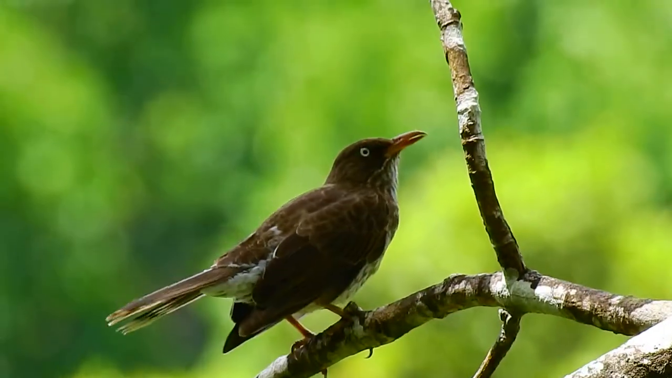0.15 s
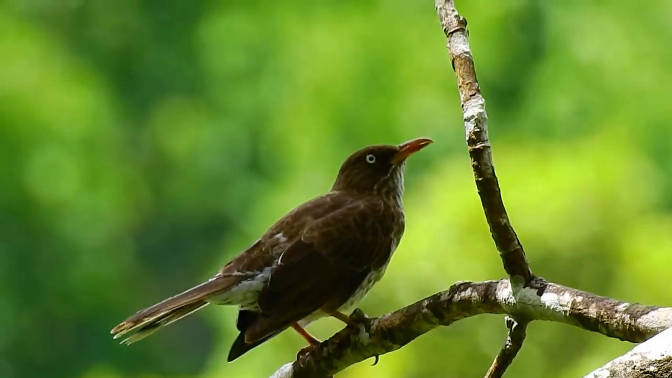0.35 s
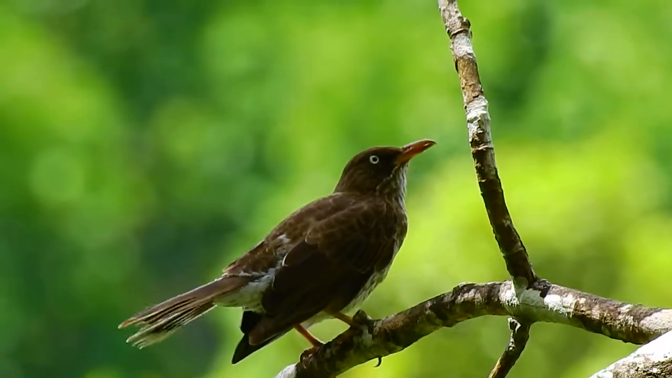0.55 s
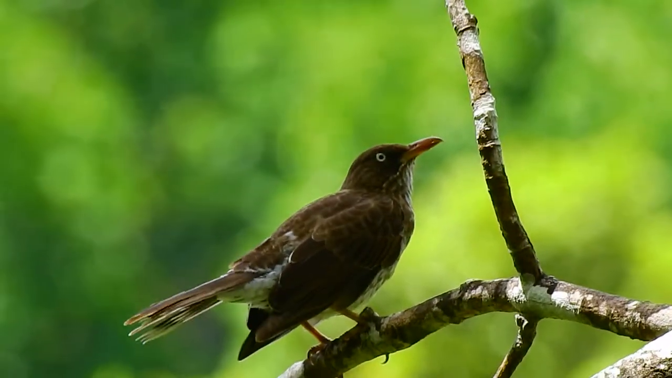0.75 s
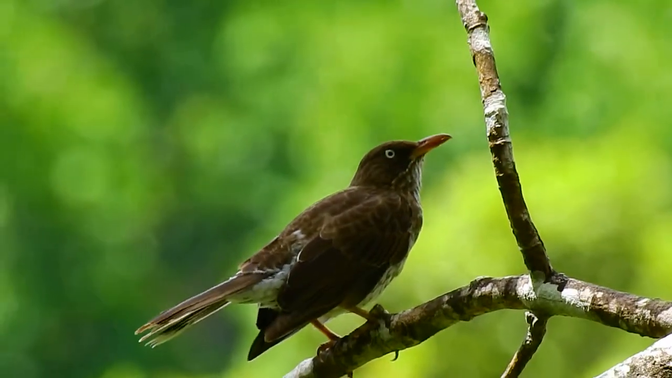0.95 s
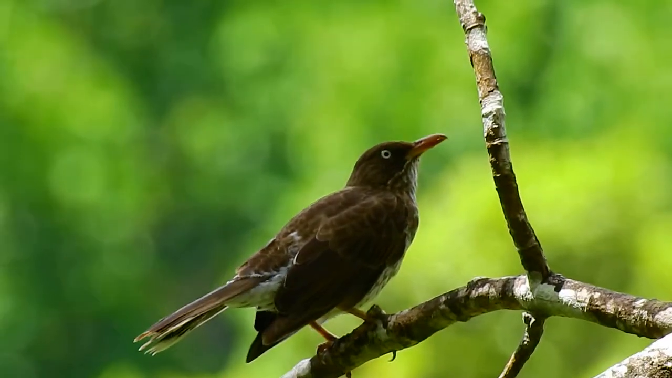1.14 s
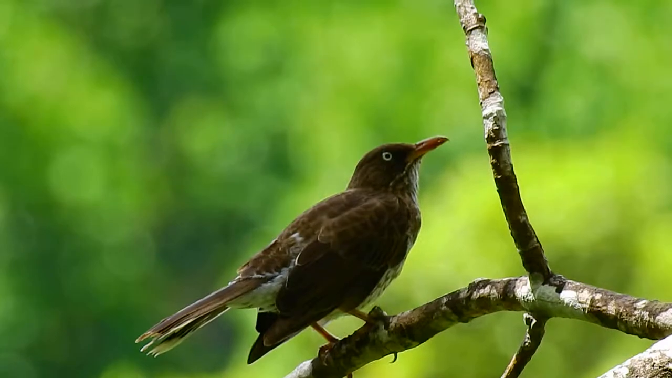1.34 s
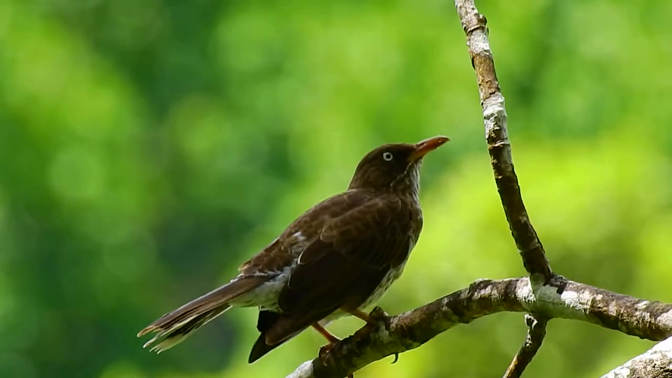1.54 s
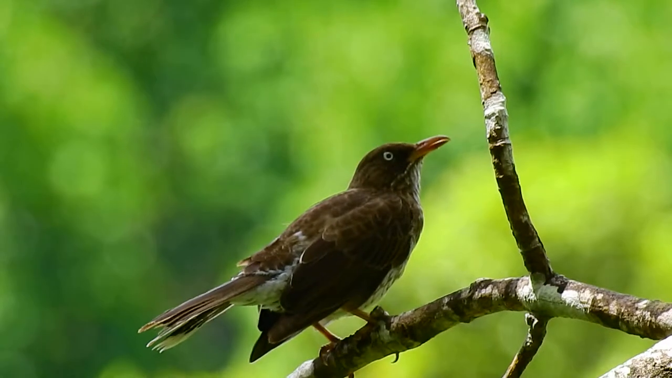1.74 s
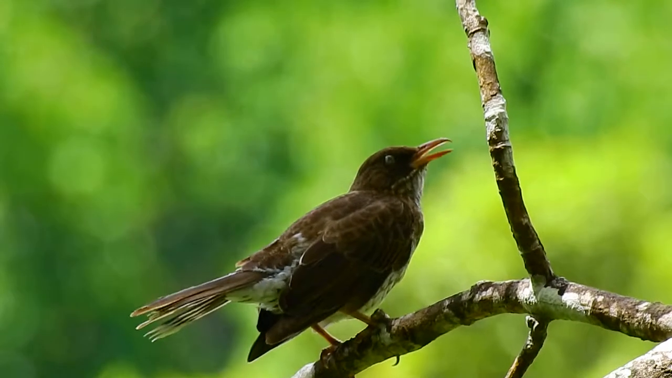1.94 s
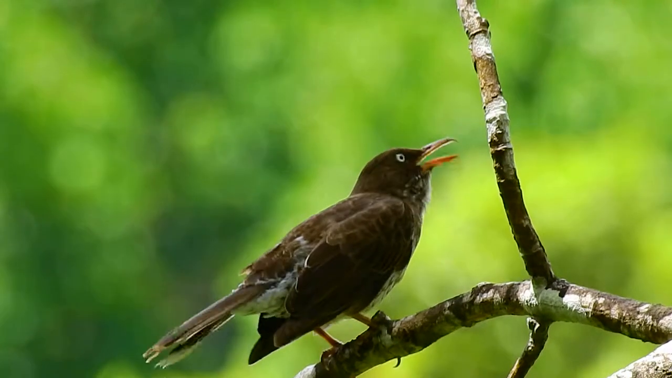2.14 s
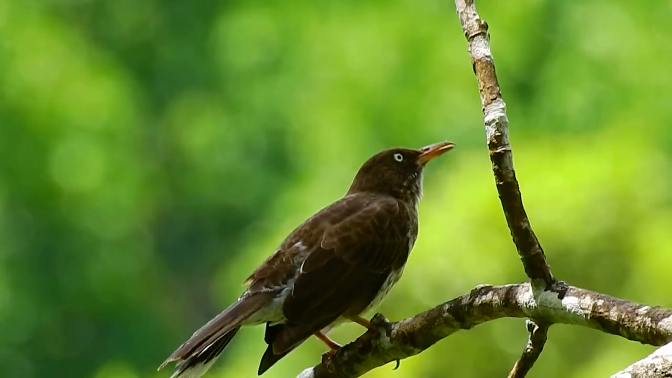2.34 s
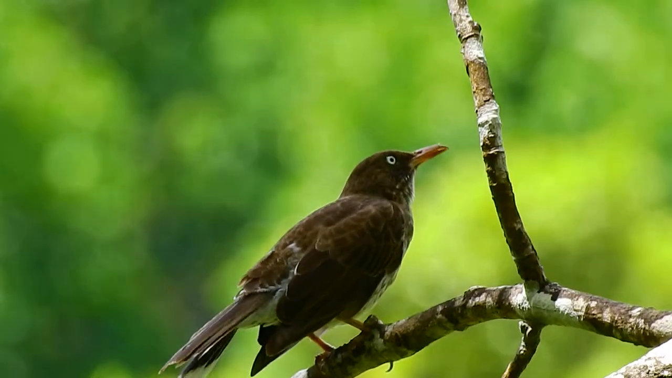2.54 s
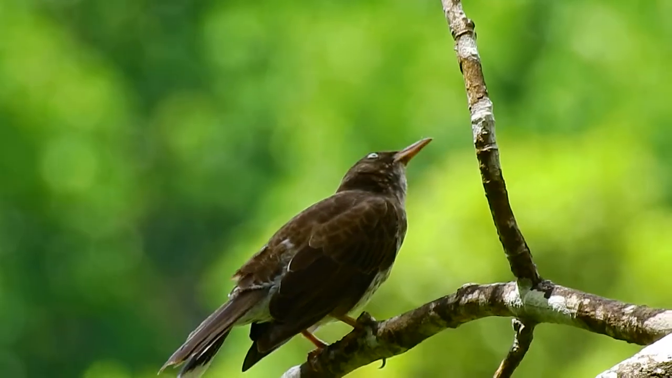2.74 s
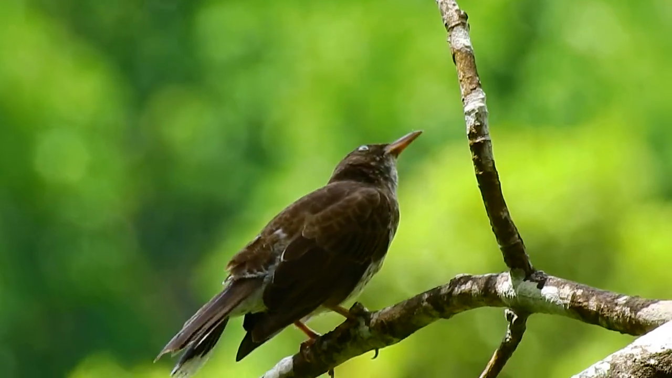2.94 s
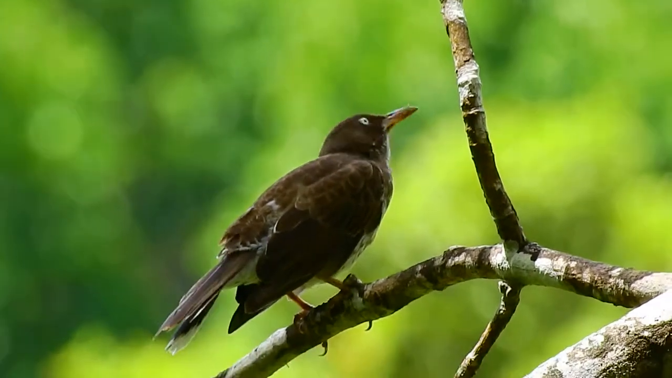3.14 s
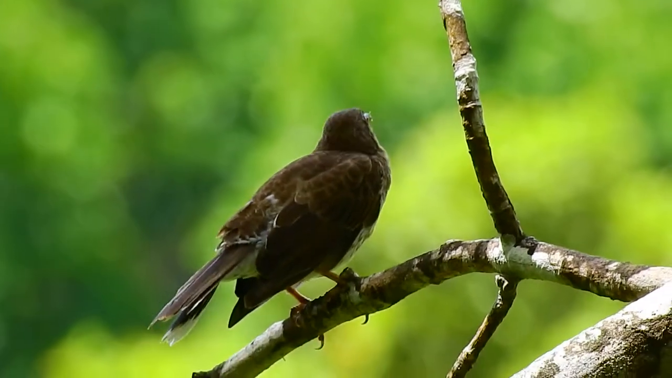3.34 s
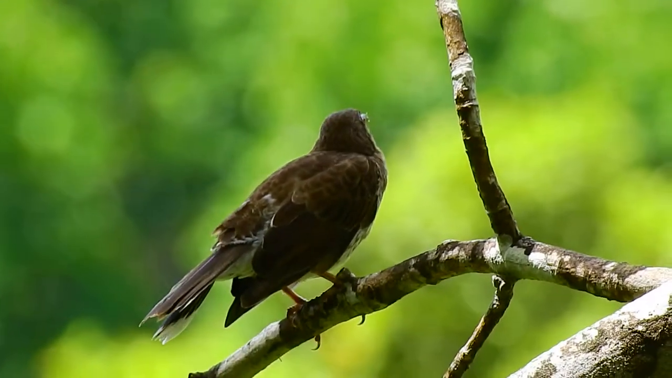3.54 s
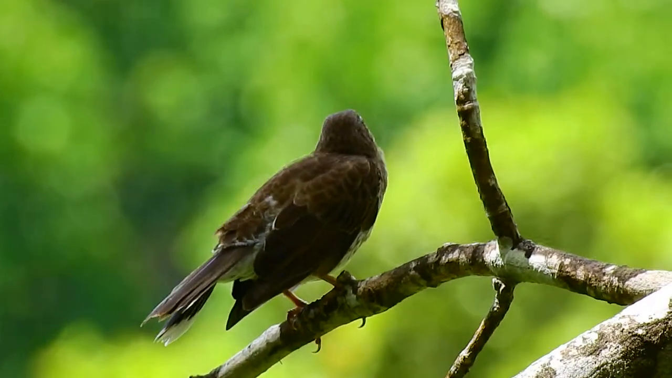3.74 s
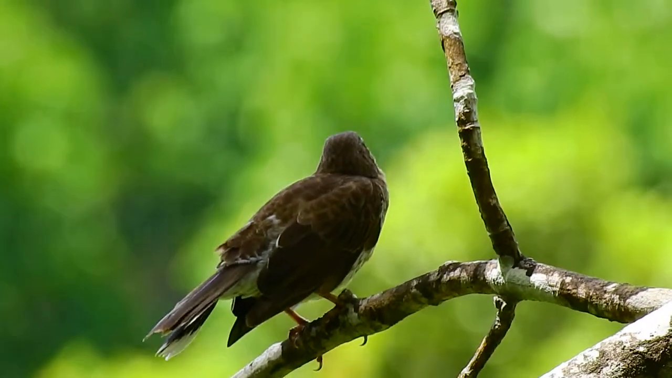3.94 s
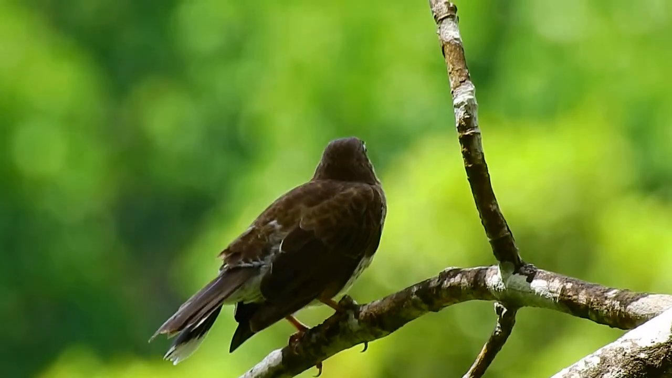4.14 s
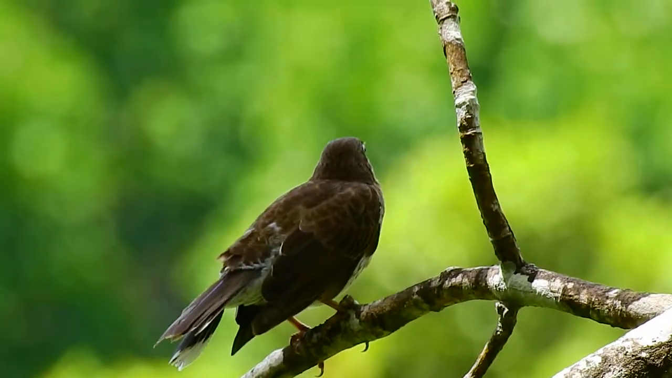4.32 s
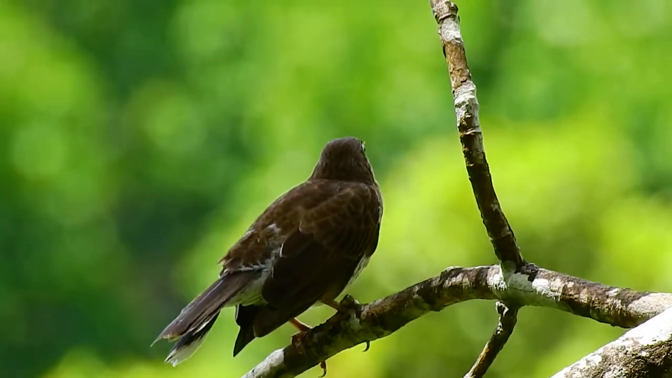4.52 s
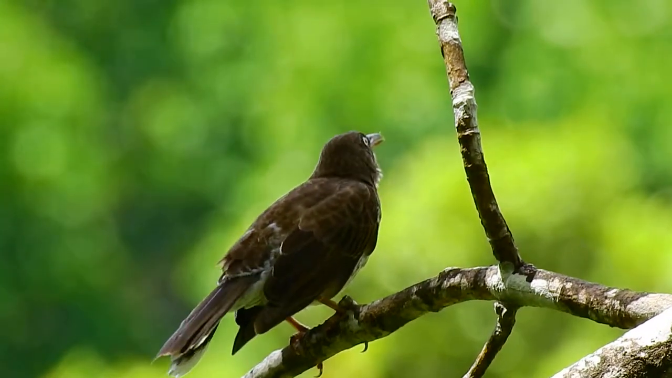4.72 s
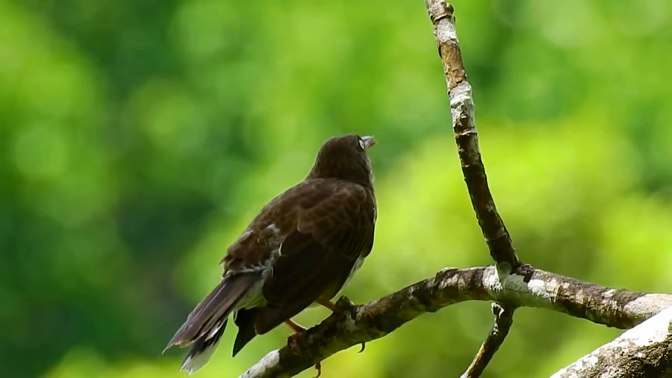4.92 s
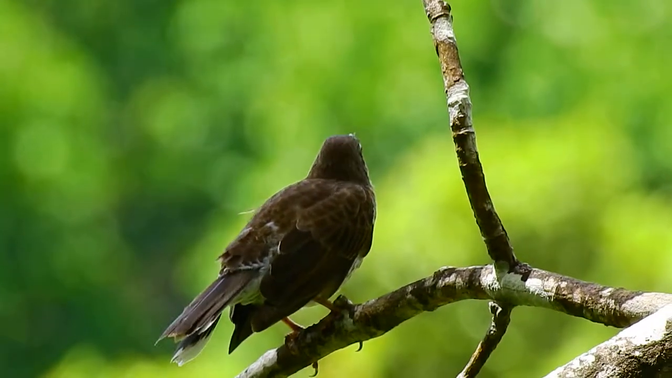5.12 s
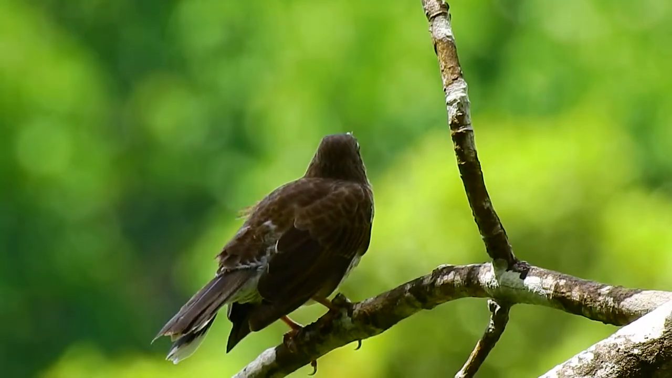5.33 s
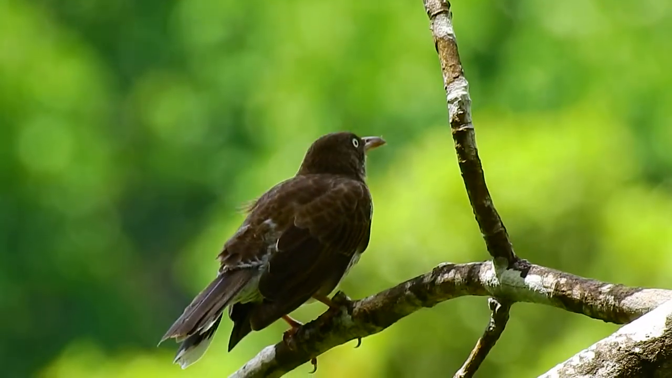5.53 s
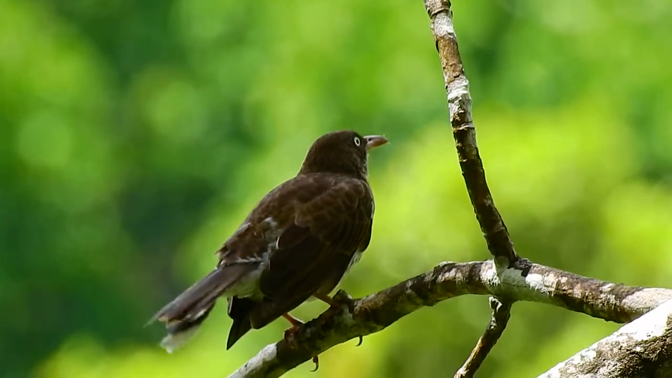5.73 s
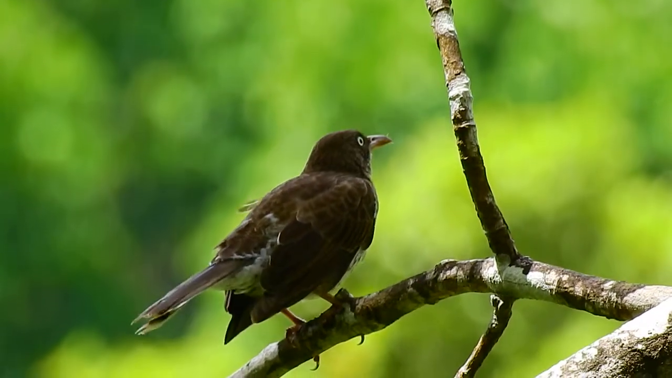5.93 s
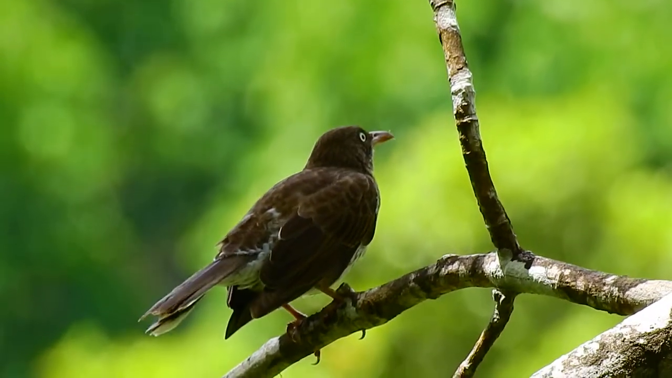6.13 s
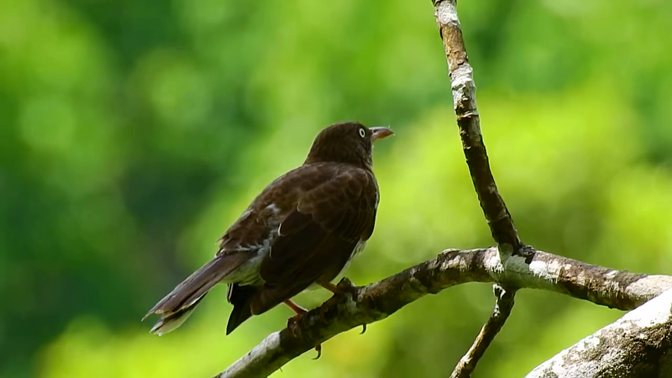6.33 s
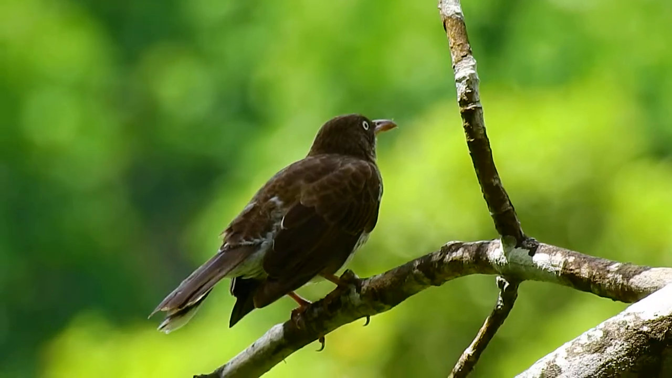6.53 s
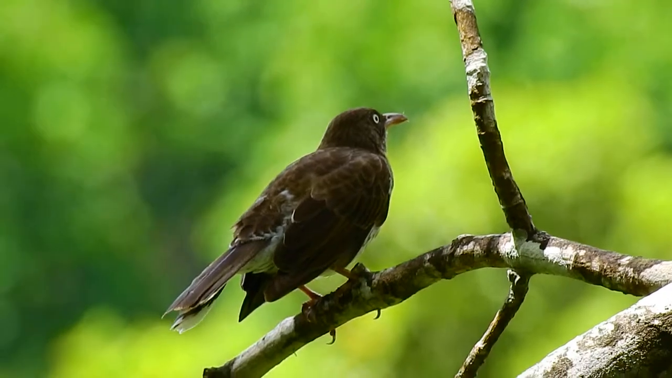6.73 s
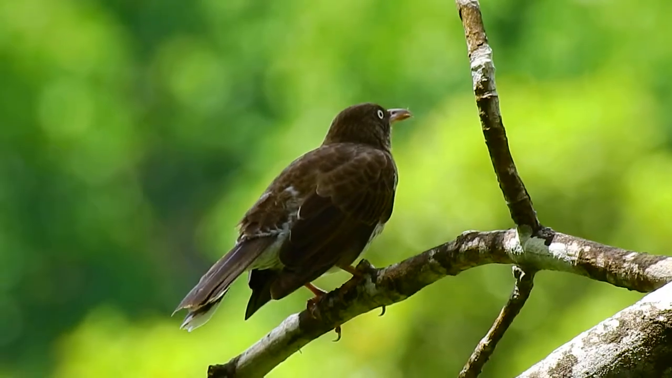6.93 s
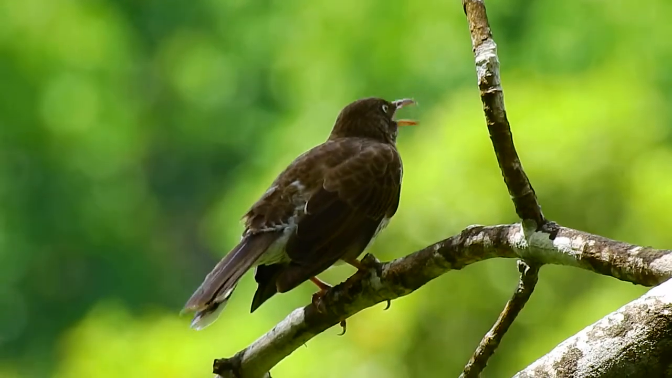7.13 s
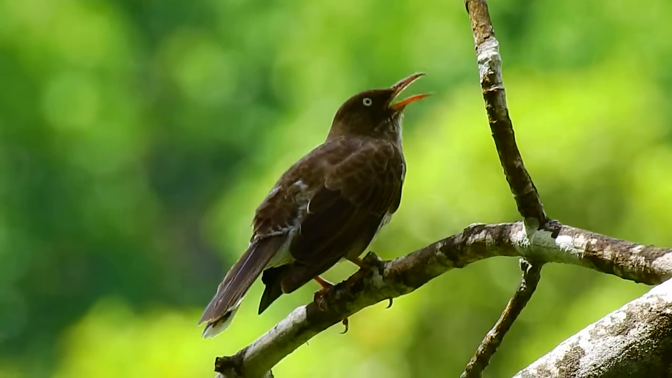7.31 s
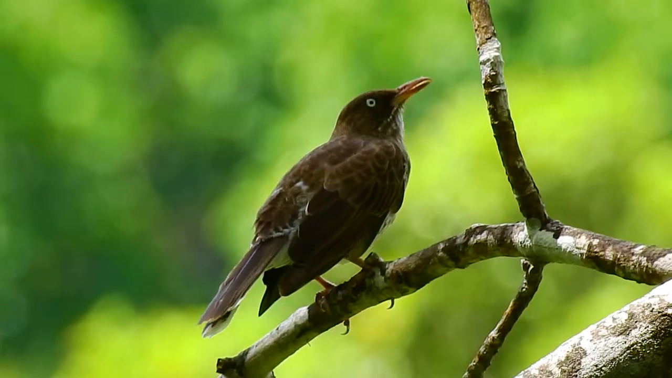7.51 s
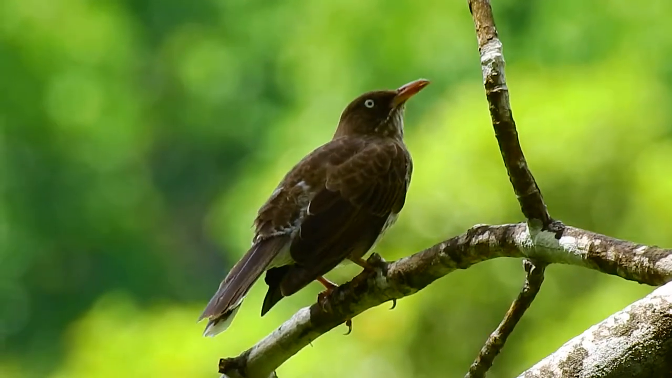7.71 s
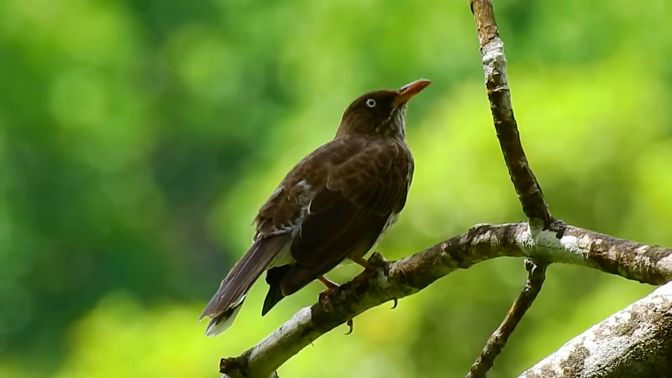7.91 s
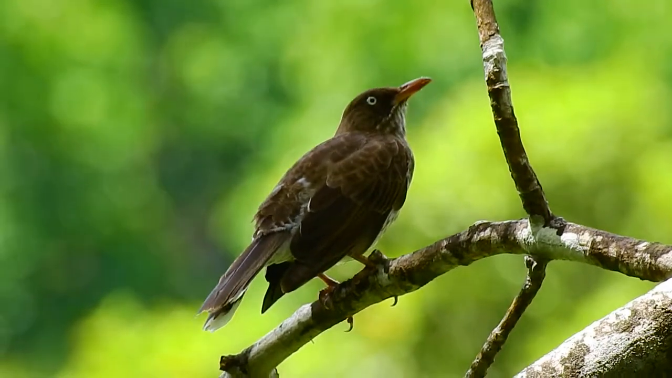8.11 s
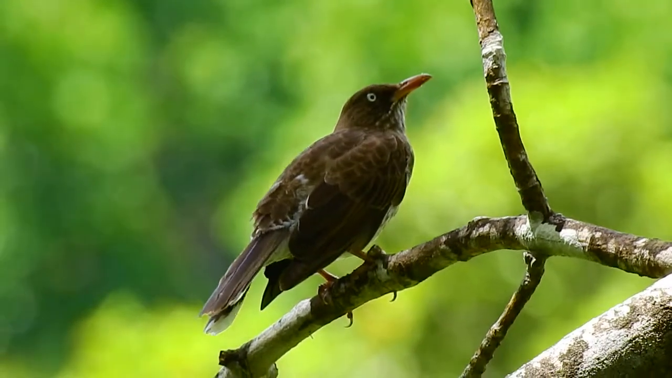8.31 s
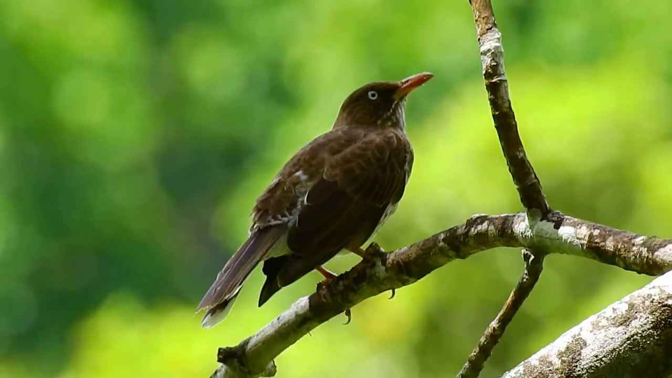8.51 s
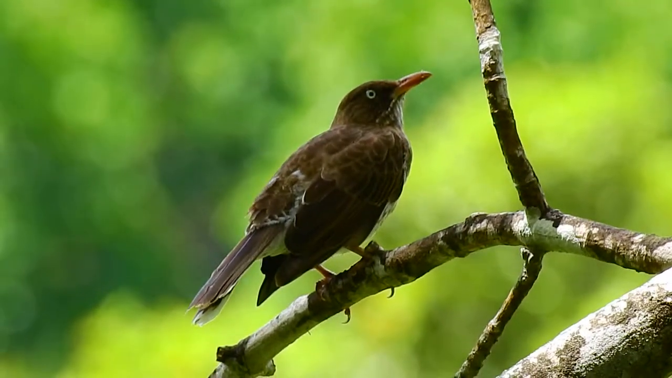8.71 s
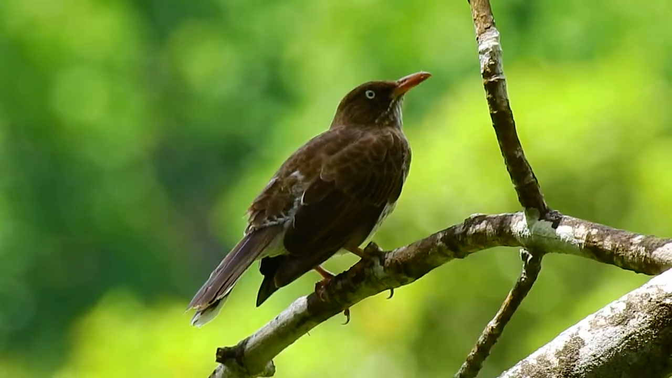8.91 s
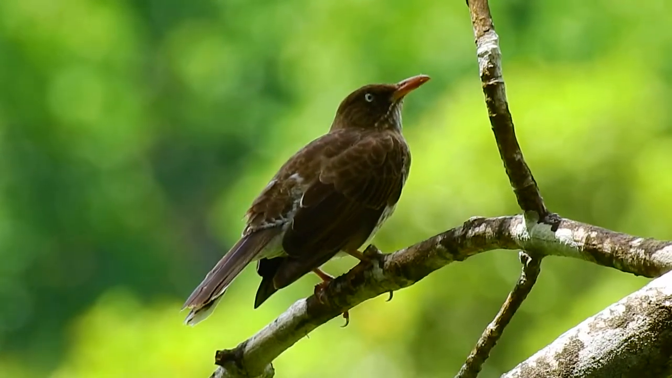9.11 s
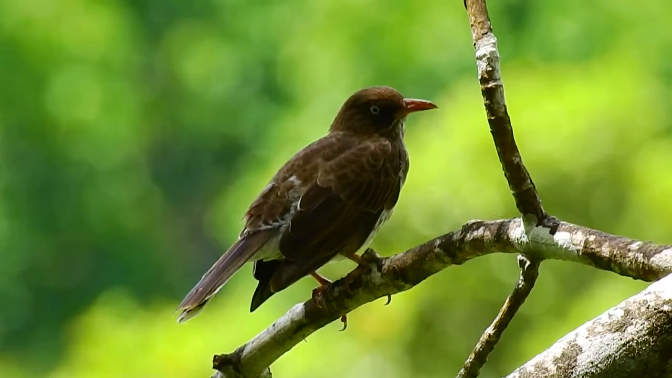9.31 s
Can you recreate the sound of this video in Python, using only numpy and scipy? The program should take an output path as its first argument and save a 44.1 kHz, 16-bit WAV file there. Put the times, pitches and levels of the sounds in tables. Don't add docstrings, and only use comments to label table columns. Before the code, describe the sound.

A nearby songbird whistles brief, bright falling phrases with woody echoes, over soft leaf hiss, distant blurred bird calls and a thin insect tone.

```python
import sys
import numpy as np
from scipy import signal
from scipy.fft import rfft, irfft, next_fast_len
from scipy.io import wavfile
from scipy.ndimage import uniform_filter1d, map_coordinates

SR = 44100
rng = np.random.default_rng(int(sys.argv[2]) if len(sys.argv) > 2 else 0)


def waveform_to_disk(signal):
    frames = np.transpose(np.atleast_2d(signal))
    scaled = np.clip(frames, -1, 1) * 32767
    samples = np.round(scaled).astype(np.int16)
    wavfile.write(sys.argv[1], SR, samples)


def invert_db(x):
    u = np.asarray(x, float) / 20
    return 10 ** u


N = 412776
LEAD_SAMPLES = SR // 4

# start_s [s], pitch_hz [Hz], level_db [dB]
SONG_NOTES = [
    [(0, 2236, -23), (0.025, 2255, -25), (0.034, 2290, -27), (0.048, 2290, -20), (0.056, 2320, -33)],
    [(2.158, 5050, -29), (2.17, 5180, -22), (2.183, 5310, -11.5), (2.192, 4830, -15), (2.204, 4426, -10),
     (2.214, 3940, -19.5), (2.222, 3740, -22), (2.23, 3540, -31)],
    [(2.24, 3264, -35), (2.248, 3090, -23), (2.256, 2776, -13.5), (2.266, 2465, -14), (2.28, 2340, -12),
     (2.293, 2210, -18.5), (2.299, 2050, -26), (2.307, 1930, -42)],
    [(2.337, 2850, -29), (2.346, 2760, -19.5), (2.354, 2450, -20), (2.362, 2050, -23), (2.372, 1620, -33),
     (2.388, 1300, -48), (2.4, 1200, -44), (2.412, 1140, -51)],
    [(7.286, 5250, -27), (7.295, 5265, -19.5), (7.312, 5190, -15.5), (7.32, 4964, -10), (7.33, 4640, -14),
     (7.35, 4430, -19.5), (7.363, 4260, -27)],
    [(7.364, 3040, -38), (7.371, 2693, -28), (7.379, 2357, -22.5), (7.39, 2143, -28.5), (7.41, 2106, -33),
     (7.435, 2086, -40)],
    [(7.401, 3080, -33), (7.412, 3303, -23), (7.428, 3330, -15), (7.44, 3450, -20.5), (7.453, 3527, -19),
     (7.461, 3580, -26)],
]
# start_s [s], pitch_hz [Hz], level_db [dB]
SOFT_NOTES = [
    [(4.743, 2155, -46), (4.755, 1800, -41), (4.768, 1582, -40), (4.788, 1534, -43), (4.8, 1540, -37),
     (4.83, 1545, -39), (4.843, 1530, -46)],
    [(4.846, 1480, -45), (4.858, 1330, -43), (4.868, 1200, -42.5), (4.874, 1130, -50)],
    [(4.74, 3390, -42), (4.75, 3200, -46), (4.768, 3200, -45), (4.785, 3180, -54), (4.8, 3180, -48),
     (4.812, 3180, -55), (4.83, 3180, -52)],
    [(7.243, 5900, -50), (7.25, 5200, -41), (7.258, 4940, -40), (7.266, 4370, -42), (7.276, 3960, -43),
     (7.295, 3550, -54), (7.312, 3250, -57)],
    [(7.453, 2850, -34), (7.459, 2650, -30), (7.465, 2350, -31.5), (7.472, 1900, -40), (7.485, 1450, -47),
     (7.496, 1220, -46.5), (7.503, 1130, -53)],
    [(4.744, 4850, -52), (4.754, 4450, -49), (4.766, 4050, -53)],
]
SOFT_ECHO_DB = [-6, -6, -12, -2, -5, -6]
# start_s [s], pitch_hz [Hz], level_db [dB]
TWANG_NOTE = [(4.738, 3380, -36), (4.748, 2605, -32.5), (4.76, 2404, -28), (4.777, 2170, -40)]
# start_s [s], length_s [s], from_hz [Hz], to_hz [Hz], level_db [dB]
NASAL_SLIDES = [
    (2.157, .053, 3940, 3942, -36.5),
    (7.278, .05, 3950, 4000, -43.5),
]
# start_s [s], length_s [s], from_hz [Hz], to_hz [Hz], level_db [dB]
EARLIER_SLIDES = [
    (-.12, .06, 8300, 6300, -19.5),
    (-.08, .04, 9300, 7600, -26),
    (-.09, .04, 4750, 4500, -26.5),
    (-.12, .04, 5300, 4900, -28.5),
    (-0.0703, .065, 2760, 2700, -19),
    (-.03, .032, 2300, 2270, -29),
    (-.1, 0.049, 3700, 3050, -29),
    (-.13, .05, 3100, 2400, -22),
]
# pitch_hz [Hz], level_db [dB]
OCTAVE_PARTIAL = [(2500, -46), (4000, -31), (4500, -30), (4900, -36), (5300, -39)]
# pitch_hz [Hz], level_db [dB]
NEAR_ECHO = [(1500, -3), (2400, -6.5), (3300, -7.5), (4000, 4), (5000, -1.5)]
# frequency_hz [Hz], level_db [dB]
BREATH_COLOUR = [(4800, -42), (5800, 3), (7000, -3), (9000, -15.5), (10300, -17.5), (11000, -45)]

# frequency_hz [Hz], density_db [dB per Hz]
WIND_COLOUR = [(16, -44), (28, -14), (54, -7), (91, -8.5), (130, -10.5), (170, -31), (290, -120)]
# time_s [s], level_db [dB]
WIND_GUSTS = [(0.0, -59.5), (0.63, -69), (1.67, -70), (1.85, -92), (2.34, -61.5), (3.1, -79), (4.25, -75),
              (6.05, -87), (6.15, -64), (6.31, -74), (6.78, -60.5), (6.88, -76), (7.56, -66), (7.61, -52),
              (7.66, -81), (7.8, -68), (9.07, -78), (9.36, -54)]
# frequency_hz [Hz], density_db [dB per Hz]
MURMUR_COLOUR = [(60, -52), (100, -26), (128, -8), (200, -1), (400, -5), (500, -3.5), (700, -8),
                 (2500, -18), (3250, -27), (5500, -120)]
# frequency_hz [Hz], density_db [dB per Hz]
LEAF_COLOUR = [(880, -4), (1500, -8), (1790, -9.5), (2570, -12), (3120, -4.5), (3870, -5.5), (4400, -4),
               (4900, -4), (5510, -2), (6700, -0.5), (8390, -13.5), (10900, -20), (15500, -27)]
# frequency_hz [Hz], density_db [dB per Hz]
DRONE_COLOUR = [(1200, -40), (1800, -3), (2500, 0), (3300, -3), (4000, -40)]
# time_s [s], level_db [dB]
DRONE_COURSE = [(0, -62), (5.9, -62), (6.15, -75), (7.1, -75), (7.7, -66), (8.2, -72), (9.36, -72)]
# frequency_hz [Hz], correlation [0 to 1]
STEREO_LIKENESS = [(90, .1), (130, .7), (200, .7), (350, .55), (700, .75), (1500, .8), (5000, .4),
                   (9000, 0)]
# frequency_hz [Hz], t60_s [s]
FOREST_DECAY = [(700, 0.23), (1500, 0.98), (2400, 0.74), (3400, 0.93), (4500, 0.87), (8000, 0.68),
                (12000, 0.1)]

# from_accent_s [s], lead_db [dB], wide_db [dB]
CHORUS_SWELL = [(-1, -45, -41.5), (-.62, -33, -33.5), (-.2, -20, -15), (0, 0, -14), (.13, -8, -12.5),
                (.42, -10, -9), (.66, -18, -16), (.88, -34, -37), (1.2, -50, -48)]
# time_s [s], level_db [dB]
CHORUS_ACCENTS = [
    (1.15, -31),
    (4.01, -31),
    (7.03, -32),
]
# time_s [s], level_db [dB], fall_s [s to lose 10 dB]
CHORUS_STIRS = [(.1, -48, 0.1), (.55, -59, 0), (3.59, -47, 0), (7.68, -47, 0.2), (7.89, -43, 0.07),
                (8.09, -36.5, 0.07), (8.27, -41.5, .03), (8.45, -55, 0.34), (8.72, -43, 0.04),
                (9.03, -45.5, 0), (9.21, -50.5, 0.1)]
# frequency_hz [Hz], density_db [dB per Hz]
CHORUS_COLOUR = [(2350, -22), (4000, -33), (4240, -20), (4500, -14), (5200, -8.5), (6540, -3), (7230, -6),
                 (8040, -12), (11000, -42), (14300, -76), (22000, -120)]

# start_s [s], length_s [s], from_hz [Hz], to_hz [Hz], level_db [dB]
FAR_LEAD_INS = [
    (2.695, .013, 8140, 7570, -29),
    (2.698, .028, 9420, 7900, -27.5),
    (5.118, 0.019, 9130, 8200, -30.5),
    (5.134, 0.015, 8200, 8120, -25),
    (8.698, .02, 9700, 8300, -46),
    (8.972, .025, 8900, 8200, -45),
]
FAR_PLUNGES = [
    (8.714, .018, 7800, 3900, -39.5),
    (8.99, .02, 8000, 5000, -40.5),
]
FAR_COOS = [
    (2.62, 0.081, 620, 720, -45.5),
    (2.71, .06, 680, 660, -49),
    (2.8, 0.047, 580, 740, -54),
    (2.62, .22, 1020, 1220, -59),
]
FAR_CHIRPS = [(4.118, .02, 4700, 4600, -47), (4.145, .04, 4500, 4400, -54), (4.365, .1, 6300, 6330, -44),
              (4.47, .08, 6400, 6250, -47), (4.585, .015, 4400, 4200, -48), (4.61, .04, 4180, 3800, -57),
              (4.7, 0.033, 3800, 3700, -59), (4.69, .055, 4950, 4980, -50),
              (7.56, 0.036, 2030, 1990, -50.5), (7.78, .05, 8300, 8200, -52),
              (7.845, .14, 8250, 7800, -44.5), (8.246, 0.0094, 6220, 6040, -34),
              (8.09, 0.025, 2930, 2960, -59)]
FAR_LISPS = [
    (.605, 0.03, 11050, 8750, -52),
    (1.09, .03, 8800, 10000, -51),
    (6.97, .07, 9300, 9100, -60),
    (8.05, .04, 6520, 4870, -37.5),
    (8.13, 0.059, 6710, 8300, -42),
    (8.37, .02, 8000, 9500, -49),
    (9.03, .02, 8300, 6700, -43),
    (9.15, 0.046, 7800, 9750, -51),
]
# start_s [s], pitch_hz [Hz], level_db [dB]
FAR_ARCHES = [
    [(5.62, 4300, -62), (5.635, 4930, -53), (5.652, 5330, -55), (5.68, 4950, -53), (5.71, 4440, -53),
     (5.722, 4230, -60)],
    [(6.27, 4650, -60), (6.29, 4400, -59), (6.32, 4750, -62)],
    [(6.34, 4850, -62), (6.37, 5000, -60), (6.39, 5150, -64)],
    [(4.202, 5300, -47), (4.212, 4840, -42), (4.22, 4700, -49), (4.228, 4450, -40), (4.238, 4150, -47.5),
     (4.246, 3860, -58), (4.254, 3600, -49), (4.272, 3430, -54)],
    [(4.475, 5040, -50), (4.49, 4750, -46), (4.505, 4445, -44), (4.52, 4470, -52)],
]
# start_s [s], pitch_hz [Hz], level_db [dB]
FAR_CHIPS = [
    [(2.705, 7700, -28), (2.712, 7450, -23), (2.717, 7150, -20), (2.72, 6400, -18), (2.723, 5800, -20),
     (2.725, 5200, -40), (2.729, 4200, -50)],
    [(5.154, 7900, -28), (5.158, 7200, -23), (5.163, 6200, -24), (5.166, 5400, -38), (5.171, 3600, -46)],
]

# start_s [s], peak_db [dB], pitch_hz [Hz], pan_db [dB], crack_db [dB]
TWIG_SNAPS = [
    (1.159, -22.5, 6560, -4, 5),
    (2.475, -24, 5400, -1, -1),
    (2.4932, -29.5, 4910, 0.0, 7),
    (5.4827, -22.5, 6000, 0, -3.5),
]
# frequency_hz [Hz], level_db [dB]
SNAP_COLOUR = [(600, -31), (2600, -4.5), (4500, -1), (8500, -2), (10000, -32), (12000, -61)]
# start_s [s], peak_db [dB]
CAMERA_BUMPS = [
    (1.161, -23),
    (9.206, -39),
    (9.326, -37),
    (9.347, -47),
]
# frequency_hz [Hz], level_db [dB], t60_s [s]
BODY_MODES = [(184.6, 7.5, 0.085), (534, -0.5, 0.055), (860, 2.5, 0.055), (1174, -10, 0.067)]

# start_s [s], pitch_hz [Hz], level_db [dB]
CRICKET_TONES = [
    [(1.205, 4900, -50), (1.235, 4870, -46), (1.29, 4800, -57), (1.38, 4580, -55), (1.46, 4600, -52),
     (1.66, 4674, -53.5), (1.8, 4650, -54), (2.0, 4650, -45), (2.15, 4644, -58)],
    [(2.75, 4900, -58), (2.8, 4830, -52), (2.83, 4600, -54), (2.9, 4560, -59)],
    [(2.93, 4570, -58), (2.96, 4600, -51), (3.03, 4630, -52), (3.09, 4790, -43), (3.16, 4780, -46.5),
     (3.21, 4585, -48.5), (3.33, 4545, -50.5), (3.42, 4500, -52.5), (3.53, 4560, -63)],
]
# start_s [s], pitch_hz [Hz], level_db [dB]
CRICKET_PIPS = [
    (2.77, 4870, -48),
    (2.791, 4800, -42),
    (2.803, 4800, -44),
    (2.816, 4550, -49),
    (2.829, 4700, -46),
    (2.84, 4700, -48),
    (2.858, 4650, -50),
    (2.879, 4700, -47),
    (2.892, 4700, -50),
]


def unit(x):
    return x / np.sqrt(np.mean(x ** 2) + 1e-20)


def along(points, hz):
    f, v = np.transpose(points)
    return np.interp(np.log(hz + 1), np.log(f + 1), v)


def course(rows):
    s, value = np.transpose(rows)
    return np.interp(np.arange(N) / SR, s, value)


def wobble(rate):
    knots = np.random.default_rng(rng.integers(9999)).standard_normal(int(N * rate / SR) + 4)
    at = np.arange(0, N, 8)
    return np.interp(np.arange(N), at, map_coordinates(knots, [at * rate / SR]))


def filtered(x, gain):
    m = next_fast_len(x.shape[-1] + 2048)
    return irfft(rfft(x, m) * gain(np.fft.rfftfreq(m, 1 / SR)), m)[..., :x.shape[-1]]


def rush(spectrum, patchy_db):
    hz, _, z = signal.stft(rng.standard_normal((2, N)), SR, nperseg=4096)
    field = uniform_filter1d(rng.standard_normal(z.shape[1:]), size=40, axis=0)
    field = uniform_filter1d(field, size=2, axis=1)
    turn = np.arccos(np.clip(along(STEREO_LIKENESS, hz), -1, 1))[:, None] / 2
    z = z * invert_db(along(spectrum, hz)[:, None] + patchy_db * unit(field))
    mid, side = z[0] * np.cos(turn), z[1] * np.sin(turn)
    return unit(signal.istft(np.array([mid + side, mid - side]), SR, nperseg=4096)[1][:, :N])


def echo(rise, early_db, early_t60, side_db, size):
    hz, t, z = signal.stft(rng.standard_normal((2, size)), SR, nperseg=256)
    decay = invert_db(-60 * t / along(FOREST_DECAY, hz)[:, None]) + invert_db(early_db - 60 * t / early_t60)
    onset = 1 - np.exp(-np.arange(size) / SR / rise)
    mid, side = signal.istft(z * decay, SR, nperseg=256)[1][:, :size] * onset
    side = side * invert_db(side_db)
    return np.array([mid + side, mid - side]) / np.linalg.norm(mid)


def add(track, x, s):
    part = track[:, LEAD_SAMPLES + round(s * SR):][:, :x.shape[1]]
    part += x[:, :part.shape[1]]


def glide(row, relax_s, attack, rise_db, fall_db):
    s, length, from_hz, to_hz, db = row
    u = np.linspace(0, 1, 17)
    done = (1 - np.exp(-u * length / relax_s)) / (1 - np.exp(-length / relax_s))
    level = np.interp(u, [0, np.clip(attack, .01, .99), 1], [db - rise_db, db, db - fall_db])
    return np.transpose([s + u * length, from_hz + (to_hz - from_hz) * done, level])


def whistle(note, octave_db, fade, shiver=0., quaver_db=0.):
    s, hz, db = np.transpose(note)
    t = np.arange(s[0], s[-1], 1 / SR)
    shake = np.interp(t, np.linspace(s[0], s[0] + 1, 250), rng.standard_normal(250))
    quaver = np.interp(t, np.linspace(s[0], s[0] + 1, 130), rng.standard_normal(130))
    turn = 2 * np.pi * np.cumsum(np.interp(t, s, hz) * (1 + shiver * shake)) / SR
    edges = np.clip(np.minimum(t - s[0], s[-1] - t) / fade, 0, 1)
    partials = np.sin(2 * turn) + invert_db(-17) * np.sin(3 * turn)
    tone = np.sin(turn) + invert_db(np.interp(t, s, octave_db + 0 * s)) * partials
    level = np.sqrt(2) * invert_db(np.interp(t, s, db) + quaver_db * quaver)
    return level * np.sin(edges * np.pi / 2) ** 2 * tone


def heard(x, direct_db, wet_db, tail, smear_hz=100, smear=0.):
    knots = rng.standard_normal(1000)
    sway = np.interp(np.arange(len(x)) * smear_hz / SR, np.arange(1000), knots)
    wet = signal.fftconvolve((x * (1 - smear + smear * sway))[None], tail, axes=1)
    return invert_db(wet_db) * wet + invert_db(direct_db) * np.pad(x, (0, wet.shape[1] - len(x)))


def songbird():
    track = np.zeros((2, LEAD_SAMPLES + N))
    open_db, foliage_db = 8.5, 4
    notes = []  # (note, second partial dB, echo dB, early scatter dB)

    def pitch(note):
        return np.median(np.transpose(note)[1])

    for note in SONG_NOTES:
        octave_db = along(OCTAVE_PARTIAL, np.transpose(note)[1])
        notes.append((note, octave_db, along(NEAR_ECHO, pitch(note)), open_db))
    for row in NASAL_SLIDES:
        note = glide(row, .011, attack=0.38, rise_db=4, fall_db=9.0)
        notes.append((note, -8, along(NEAR_ECHO, pitch(note)), open_db))
    notes.append((TWANG_NOTE, -30, along(NEAR_ECHO, pitch(TWANG_NOTE)), open_db))
    for row in EARLIER_SLIDES:
        note = glide(row, 0.0596, attack=0.92, rise_db=11.5, fall_db=0.5)
        notes.append((note, along(OCTAVE_PARTIAL, pitch(note)), -3, foliage_db))
    for note, echo_db in zip(SOFT_NOTES, SOFT_ECHO_DB):
        notes.append((note, along(OCTAVE_PARTIAL, pitch(note)), echo_db, foliage_db))

    for note, octave_db, echo_db, early_db in notes:
        tail = echo(rise=0.0038, early_db=early_db, early_t60=0.26, side_db=-8.5, size=SR * 3 // 4)
        tone = whistle(note, octave_db, fade=0.003, shiver=0.0035, quaver_db=1.4)
        add(track, heard(tone, -0.92, echo_db, tail, 155, smear=0.12), note[0][0])
    effort = uniform_filter1d(np.abs(track), size=400)
    breath = filtered(rng.standard_normal(track.shape), lambda hz: invert_db(along(BREATH_COLOUR, hz)))
    return (track + invert_db(-19.0) * effort * unit(breath))[:, LEAD_SAMPLES:]


def wind():
    gusts = invert_db(course(WIND_GUSTS) + 4.2 * wobble(6.7))
    return (gusts + invert_db(-74)) * rush(WIND_COLOUR, patchy_db=-2.5)


def calming():
    return 0.0342 * (N / 2 - np.arange(N)) / SR


def murmur():
    level_db = -50.5 + calming() + 0.5 * wobble(1.513) + 0.36 * wobble(10)
    return invert_db(level_db) * rush(MURMUR_COLOUR, patchy_db=1.73)


def leaves():
    level_db = -50 + calming() + 0.53 * wobble(1.15) + 0.5 * wobble(6)
    return invert_db(level_db) * rush([(50, -50)] + LEAF_COLOUR, patchy_db=1.5)


def insect_drone():
    band = [(300, -120)] + DRONE_COLOUR + [(8000, -120)]
    noise = rng.standard_normal((2, N)) + rng.standard_normal(N)
    return invert_db(course(DRONE_COURSE)) * unit(filtered(noise, lambda hz: invert_db(along(band, hz))))


def chorus():
    idle_db = -62
    t = np.arange(0, N, 64) / SR
    after, lead_db, wide_db = np.transpose(CHORUS_SWELL)
    stirs = 0
    for s, db, fall in CHORUS_STIRS:
        stirs = stirs + invert_db(db - 10 * np.maximum(t - s, (s - t) / .6) / fall)
    idle = invert_db(idle_db + 2.5 * np.interp(t * SR, np.arange(N), wobble(4)))
    lead = idle + stirs
    wide = idle * invert_db(1) + stirs * invert_db(-3.5)
    for s, db in CHORUS_ACCENTS:
        lead = lead + invert_db(db + np.interp(t - s, after, lead_db))
        wide = wide + invert_db(db + np.interp(t - s, after, wide_db))
    effort_db = np.interp(np.arange(N) / SR + .07, t, 20 * np.log10(lead) - idle_db)
    lead, wide = (np.interp(np.arange(N) / SR, t, level) for level in (lead, wide))
    hz = 6440 + 13 * effort_db

    def shivering():
        return np.sin(2 * np.pi * np.cumsum(hz + 220 * wobble(700) + 90 * wobble(25)) / SR)

    voice = shivering() * invert_db(3.3 * wobble(30))
    blurred = np.array([voice, voice]) + 2.8 * np.array([shivering(), shivering()])
    return (lead * unit(blurred) + wide * rush(CHORUS_COLOUR, patchy_db=2.5)) * invert_db([[-.8], [.8]])


def far_birds():
    track = np.zeros((2, LEAD_SAMPLES + N))
    lead_ins = [glide(row, 0.0296, attack=0.84, rise_db=22, fall_db=-1) for row in FAR_LEAD_INS]
    plunges = [glide(row, -0.02, attack=0.3, rise_db=4.5, fall_db=16) for row in FAR_PLUNGES]
    coos = [glide(row, .08, attack=.6, rise_db=5, fall_db=5) for row in FAR_COOS]
    chirps = [glide(row, .035, attack=0.27, rise_db=5, fall_db=10) for row in FAR_CHIRPS]
    lisps = [glide(row, 0.098, attack=0.31, rise_db=2, fall_db=11) for row in FAR_LISPS]
    kinds = [(lead_ins, -7), (plunges, -5), (FAR_CHIPS, -8), (coos, -8),
             (chirps, -1), (FAR_ARCHES, -3), (lisps, -16)]
    for notes, direct_db in kinds:
        for note in notes:
            tail = echo(rise=0.019, early_db=7.5, early_t60=0.29, side_db=-1.5, size=SR * 2 // 5)
            tone = whistle(note, -56, fade=0.0019, shiver=0.0156, quaver_db=2.5)
            add(track, heard(tone, direct_db, 3.43, tail, .17 * note[0][1], smear=0.59), note[0][0])
    return track[:, LEAD_SAMPLES:] * invert_db([[-.7], [.7]])


def twigs():
    track, t = np.zeros((2, LEAD_SAMPLES + N)), np.arange(SR // 8) / SR
    for s, db, hz, pan_db, crack_db in TWIG_SNAPS:
        crack = invert_db(crack_db) * rng.standard_normal(len(t))
        burst = invert_db(db - 60 * t / 0.007) * (np.sin(2 * np.pi * hz * t) + crack)
        snap = filtered(burst, lambda f: invert_db(along(SNAP_COLOUR, f)))
        tail = echo(rise=0.0025, early_db=19, early_t60=0.049, side_db=-0.5, size=SR // 4)
        add(track, heard(snap, 0, -1.5, tail) * invert_db([[pan_db / 2], [-pan_db / 2]]), s)
    return track[:, LEAD_SAMPLES:]


def bumps():
    track, t = np.zeros((2, LEAD_SAMPLES + N)), np.arange(SR // 8) / SR
    for k, (s, db) in enumerate(CAMERA_BUMPS):
        soft_db = -12 * (k > 0)
        ring = 0
        for hz, mode_db, t60 in BODY_MODES:
            tilt_db = soft_db * np.log2(hz / BODY_MODES[0][0])
            ring = ring + invert_db(mode_db + tilt_db - 60 * t / t60) * np.sin(2 * np.pi * hz * t)
        add(track, invert_db(db - 6.5) * np.array([ring, ring]) * (1 - np.exp(-(t / 0.0014) ** 2)), s)
    return track[:, LEAD_SAMPLES:]


def cricket():
    track = np.zeros((2, LEAD_SAMPLES + N))
    flutter = invert_db(5.6 * np.clip(wobble(40), -1.8, .6))
    for note in CRICKET_TONES:
        tone = whistle(note, -55, fade=.005, shiver=0.0051, quaver_db=2.5)
        tone = tone * flutter[round(note[0][0] * SR):][:len(tone)]
        tail = echo(rise=0.0088, early_db=6, early_t60=0.15, side_db=-1.5, size=SR // 4)
        add(track, heard(tone, 0.55, -1.5, tail, 80.8, smear=0.26), note[0][0])
    for s, hz, db in CRICKET_PIPS:
        pip = whistle([(s, hz, db), (s + .009, hz, db)], -55, fade=.003)
        add(track, pip * np.ones((2, 1)), s)
    return track[:, LEAD_SAMPLES:]


def scene():
    air = wind() + murmur() + leaves() + insect_drone()
    return songbird() + air + chorus() + far_birds() + twigs() + bumps() + cricket()


def gated_top(x, margin_db, ragged_db):
    hz, _, z = signal.stft(x, SR, nperseg=1024)
    power = np.mean(np.abs(z) ** 2, axis=0)
    bright_power = np.sum(power * (hz[:, None] / 8000) ** 2, axis=0)
    luck = rng.standard_normal((len(hz) // 16 + 1, z.shape[2]))
    luck = np.repeat(luck, 16, axis=0)[:len(hz)]
    faint = uniform_filter1d(power, size=16, axis=0) < bright_power * invert_db(2 * (margin_db + ragged_db * luck))
    silent = faint & (hz[:, None] > 10750)
    return signal.istft(z * ~silent, SR, nperseg=1024)[1][:, :N]


def top_cut(x):
    return signal.sosfilt(signal.butter(12, 15680, fs=SR, output="sos"), x)


def record(dry):
    cut = filtered(dry, lambda hz: hz ** 3 / (hz ** 3 + 45 ** 3))
    slip = 1 / (.15 * SR)
    power = signal.lfilter([slip], [1, slip - 1], np.mean(cut ** 2, axis=0), zi=[.025])[0]
    gain = (1 + power / invert_db(-41)) ** -.15
    return top_cut(gated_top(cut, margin_db=-65.5, ragged_db=2.5) * gain)


dry = scene()
out = record(dry)
waveform_to_disk(out)
```